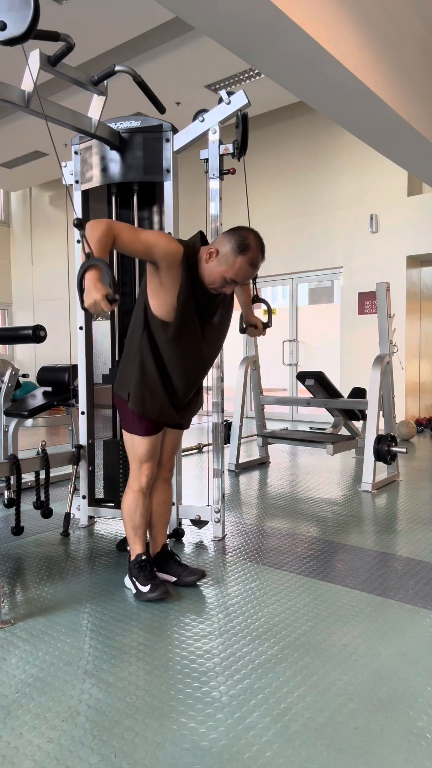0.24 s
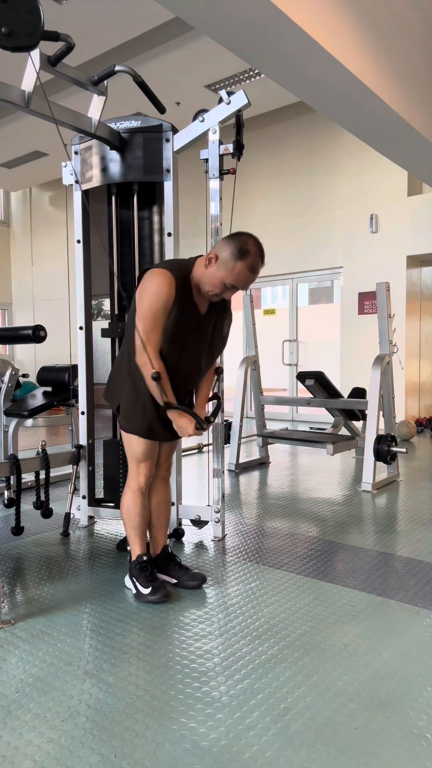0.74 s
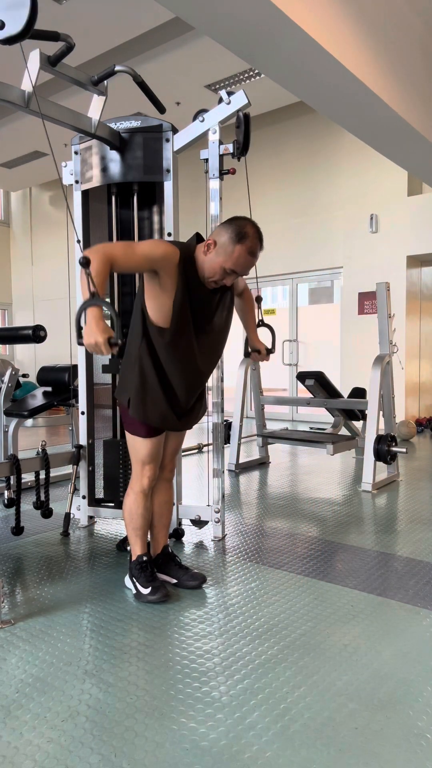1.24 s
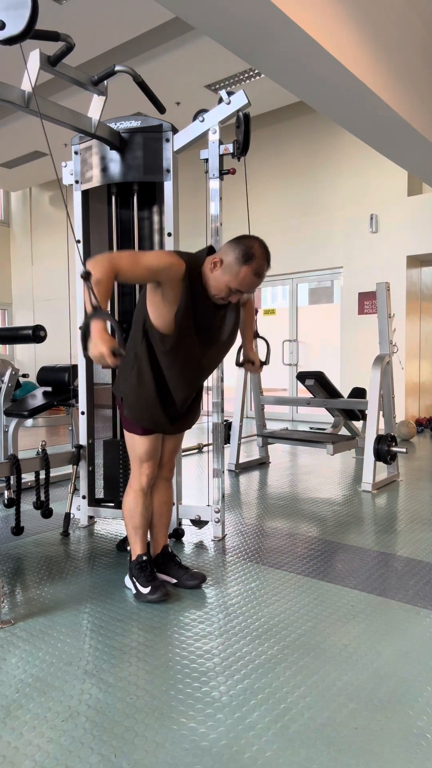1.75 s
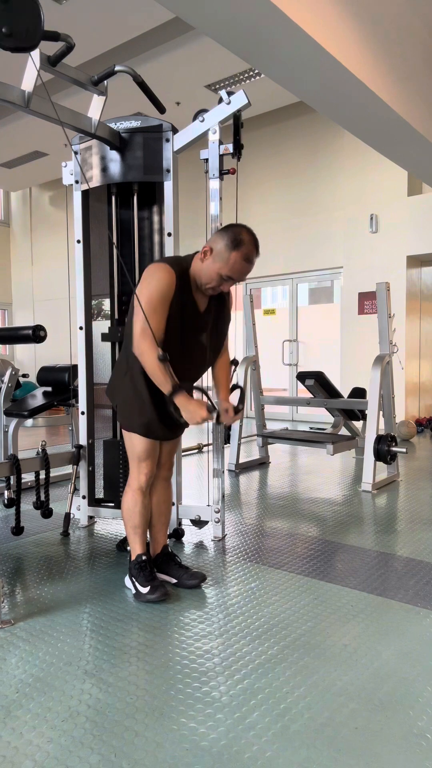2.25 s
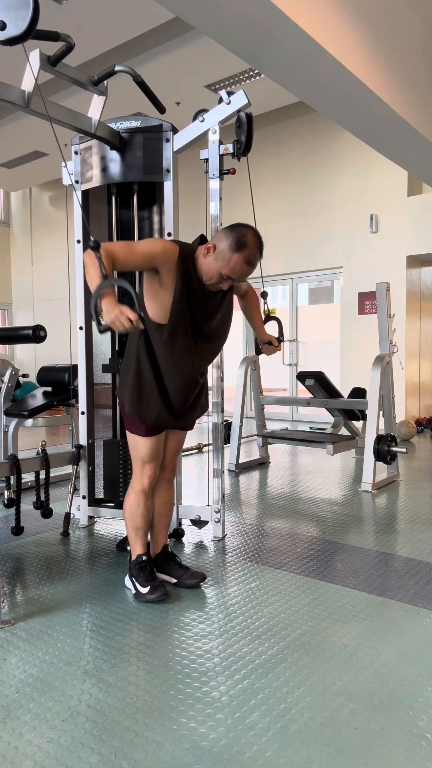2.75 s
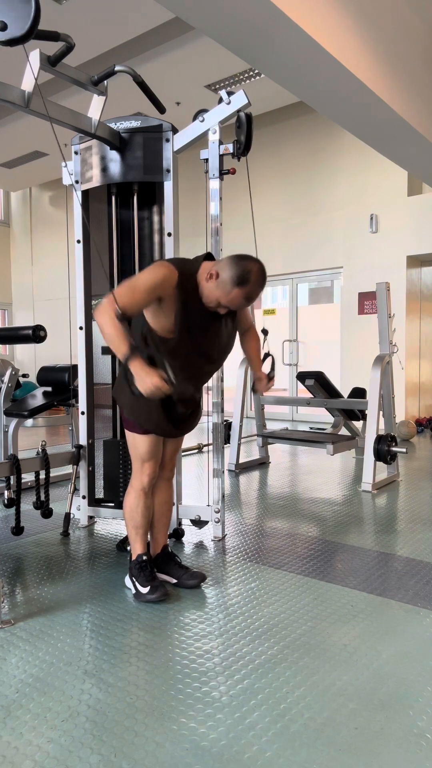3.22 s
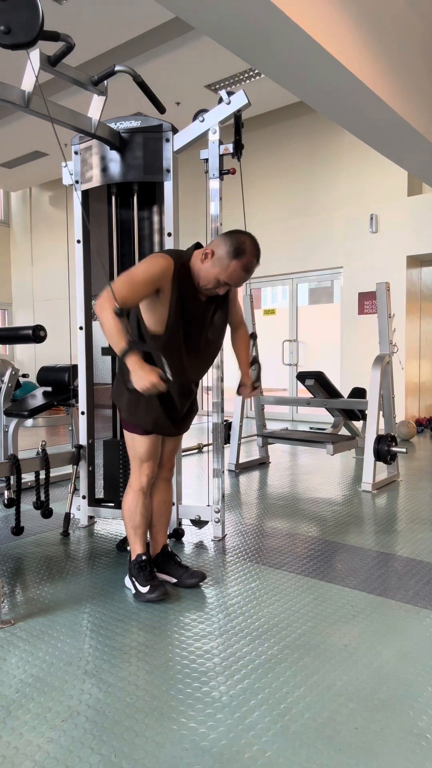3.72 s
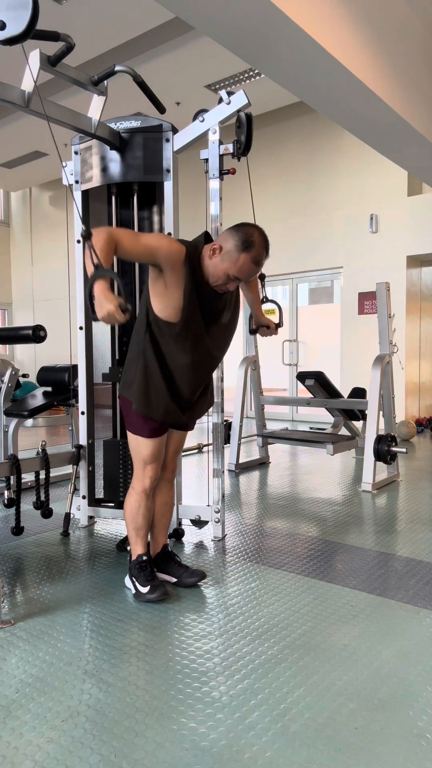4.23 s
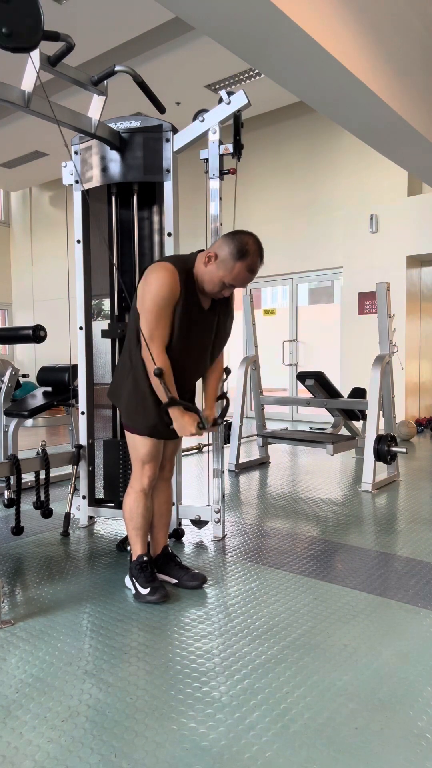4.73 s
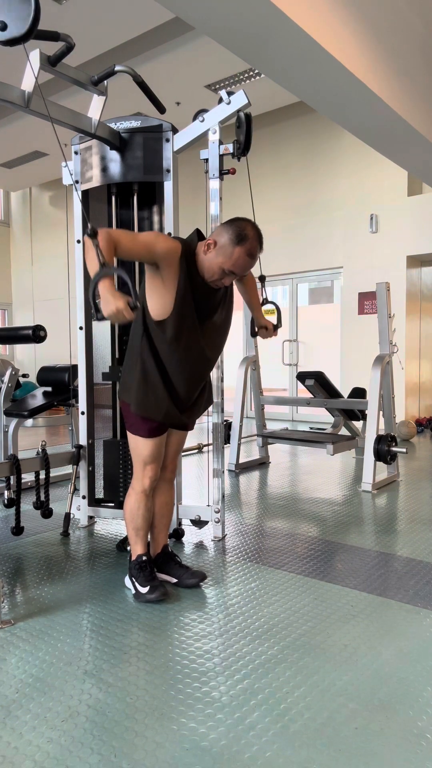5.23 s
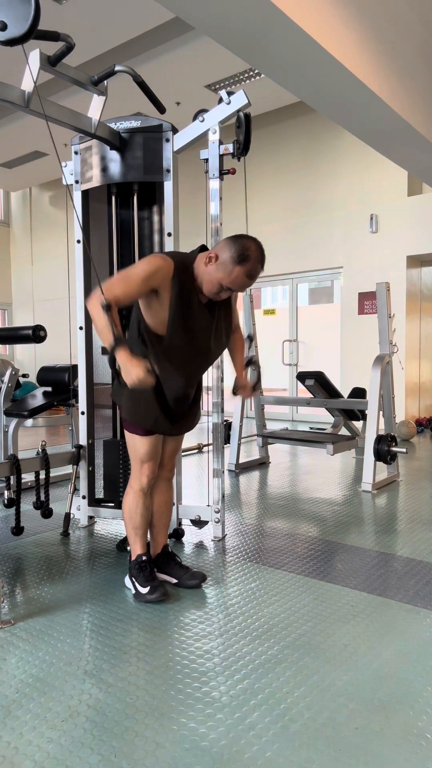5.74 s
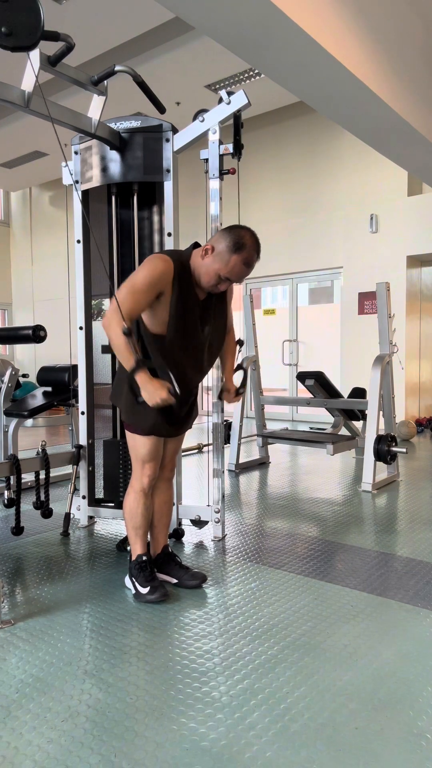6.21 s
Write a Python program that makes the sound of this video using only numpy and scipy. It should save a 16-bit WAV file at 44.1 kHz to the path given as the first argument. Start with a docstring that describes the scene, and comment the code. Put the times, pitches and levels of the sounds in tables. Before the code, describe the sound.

In a humming gym hall, metal handles clack together at an even pace, with a dull, distant weight thud near the end.

```python
"""Ventilation rumbles and mains gear hums throughout in a large, hard gym hall. From 0.75 s, some metres
from a phone, two steel cable handles knock together once a repetition, five times in all. The gripped
steel rings briefly and the hall carries its tones on. At about 5 s the rumble surges and a weight is
set down far away with a dull thud, just before the last knocks."""
import sys
import numpy as np
from scipy import signal
from scipy.fft import rfft, irfft, next_fast_len
from scipy.io import wavfile
from scipy.ndimage import uniform_filter1d

SR = 44100
rng = np.random.default_rng(int(sys.argv[2]) if len(sys.argv) > 2 else 0)


def to_wav(sig):
    """Store sig (one row per channel, or 1-D mono) as 16-bit WAV at the path in sys.argv[1].

    Samples outside -1..1 are clipped; the rate is SR.
    """
    pcm = np.clip(np.atleast_2d(sig), -1, 1) * 32767
    pcm = np.round(pcm).astype(np.int16)
    wavfile.write(sys.argv[1], SR, pcm.T)  # frames by channels


N = 285327

# Handle knocks: t/s, blow level/dB, ring against blow/dB, ring brightness/(dB per octave),
# tick against blow/dB, contact time/ms, place (-1 rim, 1 bar), slant (-1 flat, 1 edge-on)
KNOCKS = [(0.752, -22.5, -9.5, -1.6, -32, 1.4, -0.86, -0.35), (.874, -34, -20, -9, -25, 1.5, 0.34, .1),
          (0.907, -37.5, -14, -7.5, -27, 1.1, 2, 0.17), (2.175, -32, -12.5, 3.2, -11, .7, -0.38, -0.53),
          (2.182, -30, -5, -5, -34, 1.17, 0.82, -1.1), (3.457, -28, -14.5, 2.5, -27, 1.1, -0.81, 0.23),
          (3.463, -29.5, -5, -2.2, -42, 2.2, 0.93, 0.18), (4.623, -15.5, -23, -7, -25, 5.6, 0.73, 0.25),
          (4.664, -18.5, -11.5, 1.8, -38, 2.74, -0.67, 0.4),
          (4.848, -36.5, -10.5, -3, -42, 1.1, 0.25, 0.24), (5.904, -20.5, -20, -5, -16, 2.4, 0.56, 0.024),
          (5.922, -24, -12.5, 1.8, -32, 1.3, -.3, .6), (5.930, -18, -11.5, -1.5, -41, 3.3, 0.56, 0.51)]
# Tones of the steel: f/Hz, level/dB, time to fade 60 dB/s, boost when hit on the bar/dB,
# boost when hit edge-on/dB, boost into the hall/dB
STEEL_TONES = [(358.8, 0, 0.072, -0.5, 6.5, 0.5), (459.6, -2.6, 0.097, 4.5, -0.5, 2.5),
               (532.2, 0.7, 0.11, 5.5, 1, 0), (616.7, -6, 0.13, -6, 4.5, 5.5), (934, 3, 0.068, 1, 0.5, 0.5),
               (1166, 13, 0.044, -1.5, -0.5, -4), (1449, 9, 0.11, 0.5, 2, 0.1),
               (1529, 1, 0.12, 1.5, 4, -1.5), (1740.5, -0.8, .12, -9.5, 0, -3),
               (2000, -6.5, 0.088, -2.5, 0, -1.5), (2203, -24, .1, -10, 0, 9.5),
               (2395, 4, .1, 6, -3.5, -8.5), (2582, -11, 0.11, -1, -4.5, 3.5),
               (2737, -14.5, .11, -9, -2.5, 4), (2920, -6.5, 0.16, 0, -3, -3),
               (2959, 1.7, 0.08, 3, 0.5, -4), (3306, -15, .08, 4, 4, 8), (3850, -18, 0.079, 3, 0, -5),
               (4080, -0.5, 0.14, -4.5, -0.5, -7.5), (4385, -9, 0.062, -2.5, 4, 3.5),
               (4420, -8, 0.077, -5.5, -1.5, 4), (4820, 2, 0.1, 6.5, -6.5, -5),
               (4826, -7, 0.1, -4, -4.5, 1.5), (4650, -6, 0.089, -5, 4, 2), (4995, -8, .07, -1.5, 1, 4.5),
               (5220, 5, 0.036, -8, -3, -5.5)]
# Tone colour of the loose clips: f/Hz, level/dB
CLIP_COLOUR = [(200, -19), (500, 9.5), (1500, 4), (3000, -2), (5000, -1.5), (7000, -7.5), (10000, -13),
               (15000, -28)]
# A weight set down far away: t/s, f/Hz, level/dB, time to fade 60 dB/s
WEIGHT_THUDS = [(5.219, 301, -28, 0.16)]
# How long the hall rings: f/Hz, time to fade 60 dB/s
HALL_FADE = [(200, 0.96), (500, 1.97), (1500, 1.91), (3000, 1.71), (5000, 1.01), (8000, 0.57),
             (13000, 0.29)]
# Strong wall echoes: delay/s, gain in the shared sound, gain in the left-right difference
WALL_ECHOES = [(.011, 0.4, -1), (.023, -0.33, -0.095), (0.048, 0.46, .3), (.063, .55, -.5),
               (.12, 0.37, 0.009)]
# Tone colour of the moving air: f/Hz, level/dB
AIR_COLOUR = [(28, -34), (40, -7.5), (62, 1), (100, -4.5), (160, -8), (250, -10.5), (400, -16), (630, -16),
              (1000, -21), (2000, -27), (2600, -32), (4000, -37), (6300, -39.5), (10000, -56), (15000, -61)]
# Tones of the air ducts: f/Hz, half-width/Hz, level/dB
DUCT_TONES = [(112.2, 1.9, -58.5), (233.5, 11, -51.5), (420.4, 15.3, -51), (738, 10, -52.5),
              (779.5, 7.8, -51)]
# Surges of the deep rumble: start t/s, hold/s, rise/dB
RUMBLE_SURGES = [(5.05, 0.51, 15)]
# Stereo colour of the sound: f/Hz, centre level/dB, side level/dB, their likeness (used from -1 to 1)
STEREO_COLOUR = [(30, 0, -45, -0.53), (78.6, -1.5, -20, -1.06), (161, 0.5, -13.5, -0.98),
                 (370, 2.5, -8.5, -0.82), (690, -0.5, -8, -0.41), (1420, -0.5, -1, -0.14),
                 (2216, 6, -6, -0.29), (2140, -1.5, -18, 0.028), (2380, 4, 3, -0.038),
                 (4810, 0.5, -5, 0.0097), (6880, -4.5, -1, 0.12), (7900, -39.5, 6, 0), (8700, -25, -2, 0),
                 (9050, 0, 12, 0.25), (9330, 0.5, -1, 0), (9900, 1, -33, 0), (13400, 0.5, -44, 0),
                 (13400, 7, -9, 0), (14500, -8, 6, 0), (14900, -49, -4, 0)]

SIZE = next_fast_len(N + 2 * SR)
T = np.arange(N) / SR  # time/s
F = np.maximum(np.arange(SIZE // 2 + 1) * SR / SIZE, 1)  # f/Hz


def handles():
    """Each knock rings the same steel tones in a new balance. Rows: towards the phone, into the hall."""
    out, t = np.zeros((2, N)), T[:SR // 2]
    hz, tone_db, fade_s, bar_db, edge_db, hall_db = np.transpose(STEEL_TONES)[:, :, None]
    shade = undb(np.interp(t, [.024, .029], [0, -18]))  # the fists soon shield the ring from the phone
    for start, blow_db, ring_db, tilt_db, tick_db, contact_ms, place, slant in KNOCKS:
        chance_db = rng.standard_normal((len(hz), 1))
        balance_db = tilt_db * np.log2(hz / 1500) + place * bar_db + slant * edge_db
        gain = undb(tone_db + ring_db + balance_db + chance_db)
        tones = gain * fade(t, fade_s) * np.sin(2 * np.pi * hz * t)
        ring = np.array([shade * tones.sum(axis=0), (undb(hall_db) * tones).sum(axis=0)])
        knock = ring + clip_rattle(t, contact_ms) + tick(t, tick_db)
        # soft grips spread the contact over a few milliseconds
        progress = 1000 * t / contact_ms
        onset = 1 - (1 + progress) * np.exp(-progress)
        add(out, undb(blow_db) * knock * onset, start)
    return out


def clip_rattle(t, contact_ms):
    """The blow shakes loose clips: the longer the contact, the duller the rattle."""
    top_hz = 37000 / contact_ms
    softening = 1 / np.sqrt(1 + (F / top_hz) ** 2)
    colour = undb(along(CLIP_COLOUR)[0]) * softening
    return coloured_noise(len(t), colour, db=-1.12) * fade(t, .084)


def tick(t, db):
    """Steel meets steel with a short, bright burst of noise."""
    treble = (F > 6500) * F ** -.6
    return coloured_noise(len(t), treble, db) * fade(t, .054)


def far_weight():
    """A weight set down far away gives a thud: quickly fading noise around one low pitch."""
    out, t = np.zeros(N), T[:SR]
    onset = 1 - np.exp(-t / .0048)
    for start, hz, db, fade_s in WEIGHT_THUDS:
        body = coloured_noise(len(t), peak(hz, width_hz=60), db)
        add(out, body * fade(t, fade_s) * onset, start)
    return out


def hall(x, tail_db=-31, build_s=.022, echo_top_hz=5060):
    """Hard walls return a few clear echoes, then a dense tail that dies sooner in the treble."""
    t = T[:2 * SR]
    noise = rfft(rng.standard_normal((2, len(t))), SIZE)
    tail = sum(irfft(noise * shape ** 2, SIZE)[:, :len(t)] * fade(t, along(HALL_FADE, hz)[0])
               for hz, shape in bands(per_octave=1))
    spectrum = rfft(tail * (1 - np.exp(-(t / build_s) ** 2)), SIZE)
    # a well-mixed hall favours no pitch over its neighbours
    power = np.abs(spectrum) ** 2
    near, wide = (uniform_filter1d(power, int(hz * SIZE / SR)) + 1e-12 for hz in (8, 400))
    even_tail = undb(tail_db) * irfft(spectrum * np.sqrt(wide / near), SIZE)[:, :len(t)]
    echoes = np.zeros_like(even_tail)
    for delay, *gains in WALL_ECHOES:
        echoes[:, int(delay * SR)] = gains
    # walls and machines scatter the treble, so the echoes come back duller
    dull = 1 / (1 + 1j * F / echo_top_hz) ** 2
    return shaped(x, rfft(echoes, SIZE) * dull + rfft(even_tail, SIZE))


def ventilation(air_db=-34.5, flicker_db=2):
    """Air rushes in bands of noise that swell together and flicker alone; the ducts add their tones."""
    noise = rfft(rng.standard_normal((2, N)), SIZE) * undb(along(AIR_COLOUR)[0])
    swell_db = wander(.4)
    air = sum(undb(swell_db + flicker_db * wander(6)) * irfft(noise * shape ** 2, SIZE)[:, :N]
              for _, shape in bands(per_octave=2))
    out = level(air, air_db)
    for hz, width_hz, db in DUCT_TONES:
        out += level(shaped(rng.standard_normal((2, N)), peak(hz, width_hz)), db)
    return out


def mains_hum(hz=119.4, db=-42.5):
    """Mains gear hums on one steady tone."""
    return level(np.sin(2 * np.pi * hz * T), db)


def rumble(hz=62.8, base_db=-48, wander_db=7.5, rise_s=.024, fall_s=.16):
    """The ventilation's deep drone wavers in pitch and level, and steadies while it surges."""
    surge_db = sum(np.interp(T - start, np.cumsum([0, rise_s, hold, fall_s]), [0, db, db, 0])
                   for start, hold, db in RUMBLE_SURGES)
    waver = 1 - .85 * surge_db / surge_db.max()
    pitch_hz = hz + 5 * waver * wander(8.2)
    drone = level(np.sin(2 * np.pi * np.cumsum(pitch_hz) / SR), base_db)
    return drone * undb(surge_db + wander_db * waver * wander(6.2))


def undb(db):
    """Turn decibels into a gain to multiply by."""
    return 10 ** (np.asarray(db) / 20)


def along(table, hz=F):
    """Read a table's columns at any pitch, sliding between its rows."""
    table_hz, *columns = np.transpose(table)
    return [np.interp(np.log(hz), np.log(table_hz), column) for column in columns]


def shaped(x, gain):
    """Filter x with one gain for each frequency."""
    return irfft(rfft(x, SIZE) * gain, SIZE)[..., :N]


def level(x, db):
    """Set the average (rms) level."""
    return x * undb(db) / np.sqrt(np.mean(x ** 2))


def coloured_noise(samples, colour, db):
    """Noise with a given tone colour and level."""
    return level(shaped(rng.standard_normal(samples), colour)[:samples], db)


def peak(hz, width_hz):
    """A filter shape that favours one pitch."""
    return 1 / (1 + ((F - hz) / width_hz) ** 2)


def wander(per_s):
    """A smooth random curve, about 1 in size, with per_s new values a second."""
    hold = int(SR / per_s)
    steps = np.repeat(rng.standard_normal(N // hold + 1), hold)
    return .92 * uniform_filter1d(uniform_filter1d(steps, hold), hold)[:N]


def bands(per_octave):
    """Overlapping pitch bands whose powers add up to one."""
    for hz in 25 * 2 ** (np.arange(10 * per_octave) / per_octave):
        yield hz, np.cos(np.pi / 2 * np.clip(per_octave * np.log2(F / hz), -1, 1))


def add(out, x, start_s):
    """Mix x into out from start_s on."""
    i = int(start_s * SR)
    out[..., i:i + x.shape[-1]] += x[..., :N - i]


def fade(t, fade_s):
    """Fall by 60 dB in fade_s seconds."""
    return undb(-60 * t / fade_s)


def scene():
    """All sounds in the hall. Rows: what left and right share, and what sets them apart."""
    direct, into_hall = handles() + far_weight()
    row_gains = np.array([[1], [.48]])
    return direct * row_gains + hall(into_hall) + ventilation() + mains_hum() + rumble()


def record(dry):
    """Bass is nearly alike left and right; the centre has a gap near 8 kHz, the sides at 10-13 kHz."""
    shared, apart = dry
    centre_db, side_db, likeness = along(STEREO_COLOUR)
    likeness = np.clip(likeness, -1, 1)
    centre = shaped(shared, undb(centre_db))
    side = shaped(shared, undb(side_db) * likeness)
    side += shaped(apart, undb(side_db) * np.sqrt(1 - likeness ** 2))
    top_cut = signal.ellip(8, .2, 70, 15700, fs=SR, output="sos")
    return signal.sosfilt(top_cut, np.array([centre + side, centre - side]))


dry = scene()
out = record(dry)
to_wav(out)
```